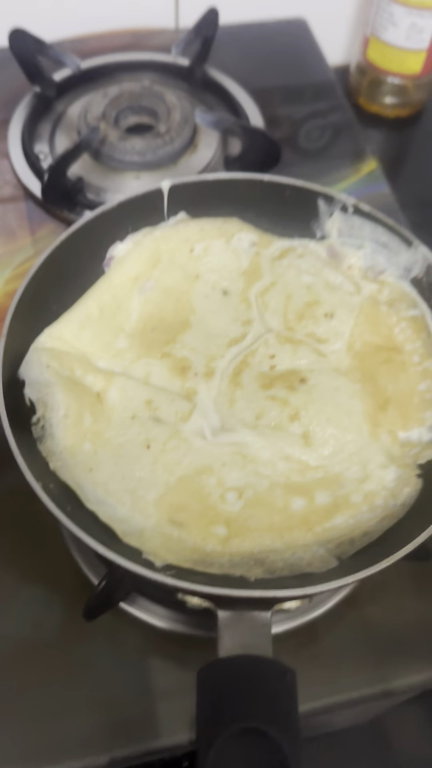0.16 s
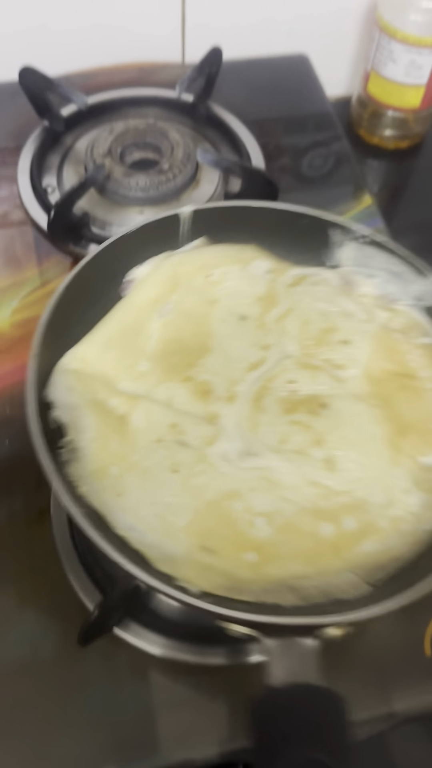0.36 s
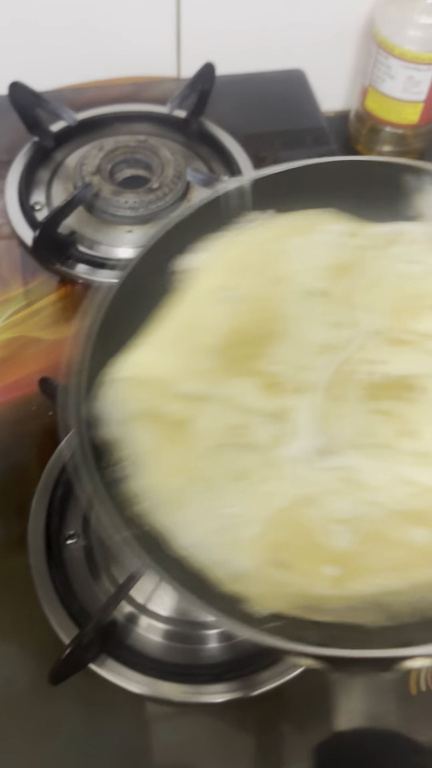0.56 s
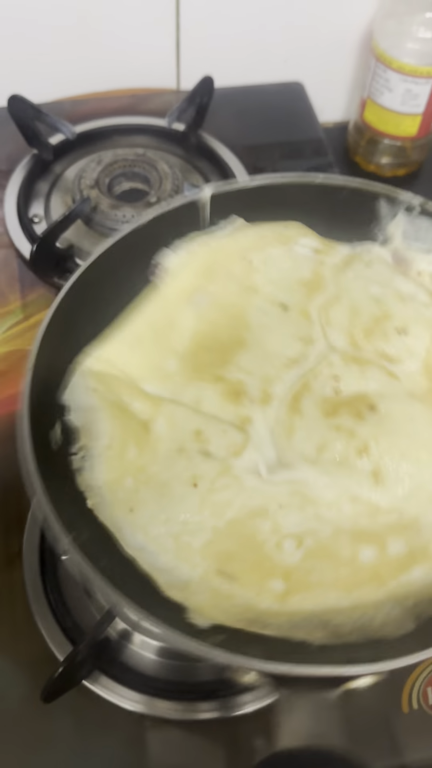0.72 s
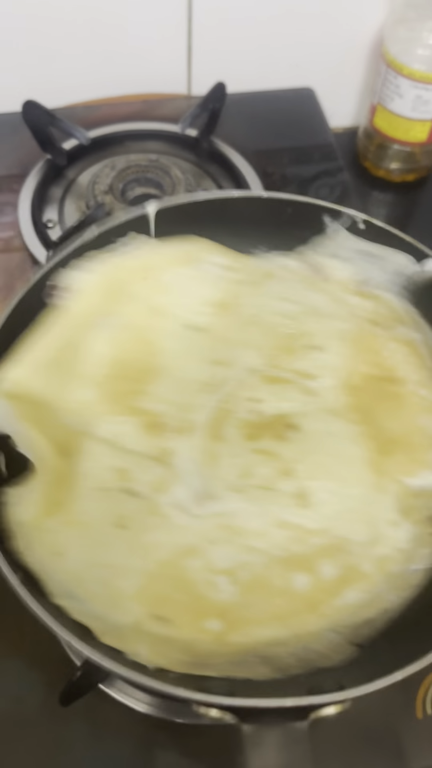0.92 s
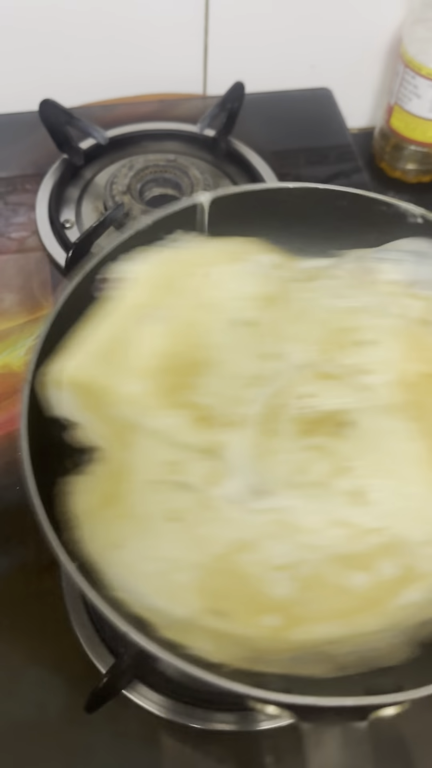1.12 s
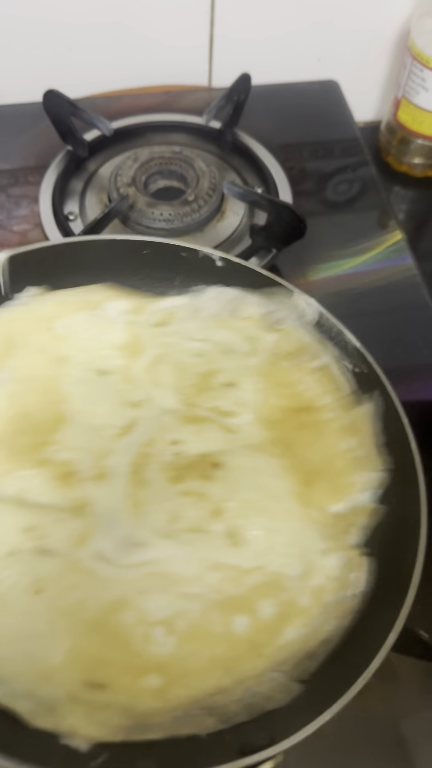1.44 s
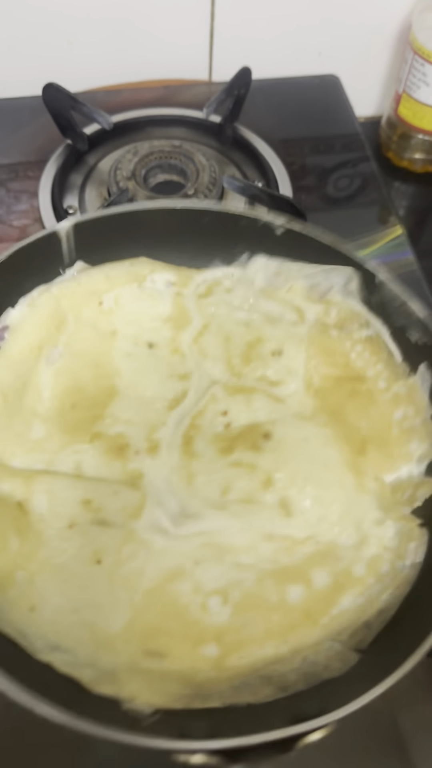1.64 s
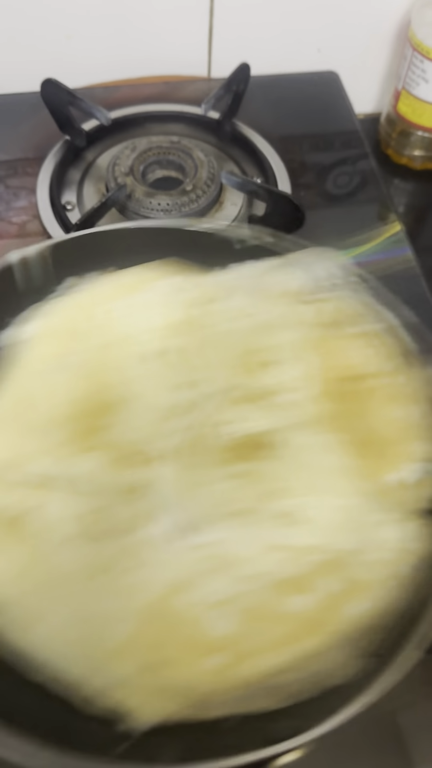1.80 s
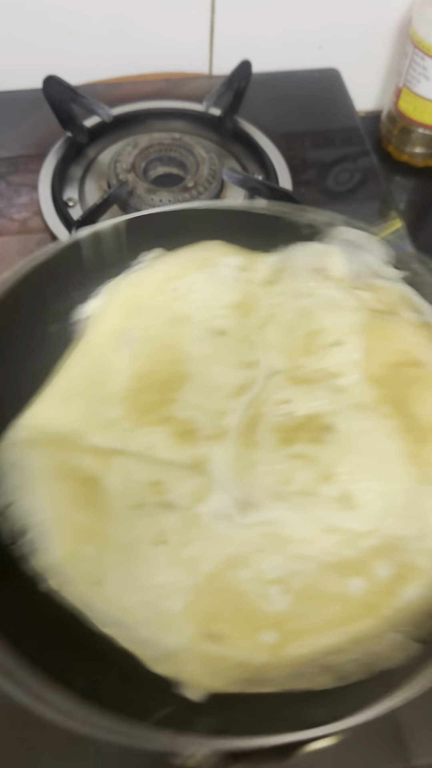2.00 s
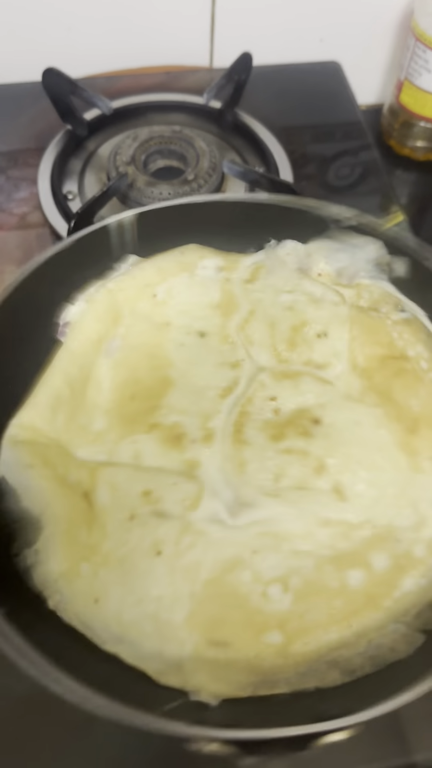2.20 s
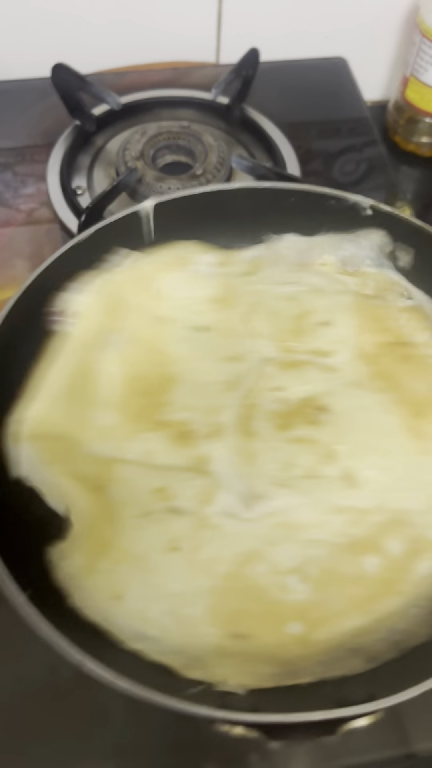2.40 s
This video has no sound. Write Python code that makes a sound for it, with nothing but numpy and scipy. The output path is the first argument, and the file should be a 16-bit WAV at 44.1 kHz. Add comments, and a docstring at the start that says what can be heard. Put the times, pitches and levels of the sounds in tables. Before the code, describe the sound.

Omelette swished back and forth in a shaken pan after one metallic clank, in a small kitchen

```python
"""A small hard kitchen, a phone held just above a frying pan that knocks once on the stove grate.
The knock is damped and long metal modes with a noisy rattle; then the pan is shaken to and fro. The omelette
slides with a grainy hiss of coloured noise, brighter one way and more ringing the other; its crisp edge ticks
on the rim as snaps and short modes, and the pan bumps now and then as clusters of mostly low modes.
Around it a noise-tail room, a burner hiss and a wavering low hum, both of filtered noise."""
import sys
import numpy as np
from scipy import signal
from scipy.fft import rfft, irfft
from scipy.io import wavfile
from scipy.ndimage import uniform_filter1d

SR = 44100
rng = np.random.default_rng(int(sys.argv[2]) if len(sys.argv) > 2 else 0)


def to_wav(s):
    """Save 16-bit WAV."""
    ch = np.atleast_2d(s).T  # columns
    pcm = np.round(np.clip(ch, -1, 1) * 32767)  # PCM
    wavfile.write(sys.argv[1], SR, pcm.astype(np.int16))


def voltage_ratio(level):
    """Linear amplitude factor for a level in decibels (scalar or array-like)."""
    return 10 ** (np.asarray(level, float) / 20)


N = 112454  # length in samples

# Level of the rub, with a click near 0.52 s, before the gain of each colour: start_s, level_db
RUB_LEVEL = [(.44, -70.5), (.51, -71), (.522, -53.5), (.54, -61), (.57, -74), (.6, -64), (.66, -59.5),
             (.71, -61), (.74, -47), (.78, -57.5), (.82, -49.5), (.86, -47), (.92, -65.5), (.95, -45),
             (.98, -53), (1.08, -53.5), (1.11, -68.5), (1.14, -49.5), (1.165, -45), (1.2, -61),
             (1.225, -46.5), (1.24, -52), (1.29, -53.5), (1.325, -66), (1.36, -47.5), (1.385, -49.5),
             (1.405, -60), (1.43, -49), (1.475, -48.5), (1.52, -66), (1.56, -51), (1.6, -57.5), (1.65, -56),
             (1.705, -69.5), (1.74, -51), (1.765, -49), (1.8, -59), (1.835, -50), (1.89, -50.5),
             (1.94, -63), (1.98, -47), (2.02, -47.5), (2.04, -60), (2.055, -51), (2.125, -51), (2.16, -64),
             (2.21, -45.5), (2.245, -53), (2.26, -52), (2.345, -50.5), (2.38, -67), (2.415, -47),
             (2.44, -47), (2.465, -59), (2.48, -49.5), (2.55, -49.5)]
# Spans with the pull colour: a faint early scrape with a click, then strokes towards the handle: start_s, end_s
PULL_SPANS = [(.44, .71), (.785, .915), (.975, 1.11), (1.2, 1.325), (1.405, 1.52), (1.595, 1.705),
              (1.805, 1.94), (2.038, 2.16), (2.248, 2.38), (2.465, 2.6)]
# Colour of the rub away from the handle: pitch_hz, relative_level_db
PUSH_COLOUR = [(180, -44), (300, -6.5), (630, -5.5), (1020, 2.5), (1700, -1), (2900, -2), (4000, -2),
               (4900, -8), (5600, -1), (7500, 3.5), (10000, 0), (12500, -5.5), (15000, -2.5), (16500, -23)]
# Colour of the rub towards the handle: pitch_hz, relative_level_db
PULL_COLOUR = [(180, -44), (300, -8), (650, -6.5), (920, 1), (1690, -2.5), (2320, -5.5), (3800, -2),
               (4900, -8.5), (5600, 0), (7900, 3), (10000, 1.5), (12500, -7), (15000, -1), (16500, -26)]
# Resonances of the pan floor that the pull excites: pitch_hz, width_hz, level_db (against the pull)
PAN_FLOOR_MODES = [(2300, 320, -12.5), (2477, 106, -14.5), (2800, 140, -18), (3230, 400, -15)]
# Ticks of the crisp edge on the rim: start_s, relative_level_db, centre_hz
EDGE_TICKS = [(0.4451, -47, 2800), (0.482, -44, 2390), (0.521, -41, 2470), (0.5285, -41.5, 3450),
              (0.5466, -45, 2880), (0.642, -37.5, 2860), (0.7342, -37, 3300), (0.7396, -31.5, 3580),
              (0.8339, -36, 2200), (0.851, -45, 2440), (0.881, -36, 2980), (0.984, -30.5, 2550),
              (1.2226, -28, 3440), (1.2266, -34.5, 3840), (1.4108, -32.5, 3500), (1.4155, -35, 2570),
              (1.5873, -36.5, 2280), (1.821, -29, 2540), (1.8277, -32, 2460), (1.8454, -36, 2390),
              (1.9753, -38, 2090), (2.0489, -26, 2780), (2.0549, -26.5, 2660), (2.1043, -34, 3060),
              (2.2547, -31, 3210), (2.2661, -23.5, 2720), (2.2741, -31.5, 2270), (2.402, -40, 4100),
              (2.4221, -37, 3700), (2.4821, -26.5, 2300)]
# Modes of one tick: multiple_of_centre, relative_level_db
TICK_MODES = [(.85, -8), (1, 1.5), (1.2, -6), (1.451, -7), (2.6, -14.5)]
# Dull bumps of the pan: start_s, relative_level_db, centre_hz, t60_s
PAN_BUMPS = [(0.7015, -35.5, 940, 0.011), (.754, -45.5, 440, 0.027), (0.933, -42, 1000, 0.01),
             (.942, -38, 800, 0.014), (0.949, -37.5, 98, 0.069), (.955, -45.5, 313, 0.063),
             (0.984, -42, 92, 0.054), (0.987, -45.5, 280, 0.039), (1.14, -38, 800, 0.014),
             (1.142, -43, 245, 0.03), (1.318, -42, 900, 0.014)]
# Modes of one bump: multiple_of_centre, relative_level_db
BUMP_MODES = [(.6, -4.5), (1, -1.5), (1.5, -4.5)]
# Quickly damped modes of the blow itself: pitch_hz, relative_level_db, t60_s
BLOW_MODES = [(572, 9, 0.05), (800, 13.5, 0.047), (1040, 15.5, 0.032), (1380, 14.5, 0.022),
              (2335, 6, 0.043), (2793, 6, 0.036), (4060, 2, 0.025), (6700, -6, 0.026), (8400, -8, .03)]
# Long modes of pan and grate: pitch_hz, relative_level_db, t60_s
RING_MODES = [(247.5, -8, 0.33), (318.7, -7, 0.52), (422.5, -9, 0.16), (842, -10, 0.27), (1073, -17, 0.22),
              (1260, -14, 0.1), (1340, -23, 0.2), (1694, -33, 0.35), (1870, -13.5, 0.23), (2320, -11, 0.15),
              (2493, -15, 0.37), (2735, -9, 0.23), (3100, -23, 0.23), (4100, -20, 0.24)]
# Colour of the rattle after the blow: pitch_hz, relative_level_db
RATTLE_COLOUR = [(88, -32), (150, -3.5), (248, 3.5), (441, -6.5), (812, -7), (2140, -13), (2710, -15.5),
                 (4900, -24.5), (7960, -23), (11000, -36), (14300, -86), (22000, -120)]
# Colour of the burner hiss: pitch_hz, relative_level_db
HISS_COLOUR = [(90, -40), (140, -12.5), (290, -12), (600, -17), (1130, -15), (1750, -20), (2600, -18.5),
               (4900, -27), (7500, -22.5), (10000, -23.5), (12500, -35), (15000, -27), (16500, -49)]
# The lower part of the hiss comes and goes: start_s, gain_db
LOW_HISS_GAIN = [(0, 4), (.35, -2.5), (.58, -8), (.8, 4), (1.05, -2), (1.27, -7), (1.4, 3), (1.52, -3),
                 (1.62, -1), (1.7, -8), (1.88, -5), (2.1, 2.5), (2.55, 3.5)]
# Colour of the hum: pitch_hz, relative_level_db
HUM_COLOUR = [(20, -44), (32, -9), (50, -2), (60, -2.5), (66, 10), (73, 1), (96, 0), (150, -8),
              (200, -12.5), (280, -17), (400, -70)]
# Swell of the hum: start_s, level_db
HUM_SWELL = [(0, -62.5), (.1, -61.5), (.16, -53.5), (.36, -62.5), (.46, -57), (.6, -63.5), (.9, -66.5),
             (1.9, -66), (2.15, -62), (2.3, -49.5), (2.55, -56.5)]
# Phase by which the left microphone port lags the right: pitch_hz, lag_radians
LEFT_PORT_LAG = [(0, 0), (2000, 0), (4000, .2), (6600, 0), (7300, .7), (10300, 2.1), (11200, 2.9),
                 (12500, np.pi), (13800, 3.4), (15700, 4.2)]
# Share of the sound that is unlike at the two ports: pitch_hz, level_db
UNLIKE_SHARE = [(60, -25), (250, -16.5), (500, -5.5), (1300, -11), (2000, -27.5), (2600, -10), (4400, -5.5),
                (6200, -16), (8000, -17), (16000, -24)]

# Flicker and waver settings are dB per unit of a smoothed random level, drawn afresh at the given rate
# Slide
PUSH_GAIN_DB, PULL_GAIN_DB, COLOUR_BLEND_S, SLIDE_FADE_IN_S = 4.5, 4, 0.01, 0.018
GRAINS_PER_S, GRAINS_DB = 2500, -2.5  # grain level before it joins unit-level smooth noise
GRAIN_SPREAD_DB, GRAIN_TOP = 3.5, 3.5  # dB per unit of an exponential draw, draw limit
FLICKER_DB, FLICKER_HZ = 2.0, 74.96
FLOOR_WAVER_DB, FLOOR_WAVER_HZ = 1.7, 30.3
BODY_LEAD_S, BODY_TOP_HZ = 0.01, 2000
# Ticks and bumps
TICK_TRIM_DB, TICK_RISE_S, TICK_DETUNE = -3.5, 0.0011, 0.035
TICK_T60_S, TICK_T60_S_PER_DB, TICK_T60_AT_DB = 0.013, 0.0005, -36
SNAP_DB, SNAP_DECAY_S, BUMP_RISE_S = -2.5, 0.0011, 0.00051
# Knock
KNOCK_S, KNOCK_MODES_DB, KNOCK_CUT_HZ = 0.1074, -33, 200
PUSH_CYCLES = 0.45  # time constant of each mode's rise, in its own cycles
RATTLE_DB, RATTLE_SPLIT_HZ, RATTLE_RISE_S = -27, 400, 0.0017  # level before it decays
RATTLE_HIGH_T60_S, RATTLE_LOW_T60_S, RATTLE_LOW_GAIN_DB = 0.22, 0.25, -1.0
KNOCK_LEFT_DB = -2.5  # left port in the body of the knock; the right gains what the left loses
# Room, burner and ports
ROOM_LOW_T60_S, ROOM_TREBLE_T60_S, ROOM_DB, ROOM_GAP_S = 0.42, 0.27, -12.5, 0.004
HISS_DB, LOW_SPLIT_HZ = -63, 750  # hiss level before it wavers
HISS_WAVER_DB, HISS_WAVER_HZ, LOW_WAVER_DB, LOW_WAVER_HZ = 3, 7.63, 1.6, 11
SMEAR_S = 0.017


def level(x, db):
    """Scale to an rms level."""
    return x * voltage_ratio(db) / np.sqrt(np.mean(x ** 2) + 1e-18)


def colour(x, table):
    """Filter by (Hz, dB) points joined on a log frequency axis."""
    hz, db = np.array(table, float).T
    f = np.maximum(np.arange(N // 2 + 1) * SR / N, 1)
    gain = voltage_ratio(np.interp(np.log(f), np.log(hz), db))
    return irfft(rfft(x, N) * gain, N)


def curve(table):
    """Gain along (s, dB) points."""
    s, db = np.array(table, float).T
    return voltage_ratio(np.interp(np.arange(N) / SR, s, db))


def random_level(hz):
    """Independent random values drawn hz times a second, with straight slews between them."""
    hold = int(SR / hz)
    values = rng.standard_normal(N // hold + 1)
    return uniform_filter1d(np.repeat(values, hold), hold)[:N]


def highpass(x, hz):
    """Steep low cut."""
    return signal.sosfilt(signal.butter(4, hz, "high", fs=SR, output="sos"), x)


def ring(t, hz, t60):
    """A damped mode that starts at t = 0."""
    u = np.maximum(t, 0)
    return np.sin(2 * np.pi * hz * u) * np.exp(-np.log(1000) * u / max(t60, 0.002))


def add(out, s, sound):
    """Mix a short sound in at time s."""
    i = int(s * SR)
    out[i:i + len(sound)] += sound[:N - i]


def friction():
    """Rubbing surfaces: smooth noise plus small random grains, with a quick flicker of level."""
    is_grain = rng.random(N) < GRAINS_PER_S / SR
    size = voltage_ratio(GRAIN_SPREAD_DB * np.minimum(rng.exponential(size=N), GRAIN_TOP))
    grains = is_grain * size * np.sign(rng.standard_normal(N))
    rough = rng.standard_normal(N) + level(grains, GRAINS_DB)
    return rough * voltage_ratio(FLICKER_DB * random_level(FLICKER_HZ))


def pull_rub(rough, rub):
    """Rub in the pull colour: coloured friction plus the pan-floor resonances it excites."""
    pulled = level(colour(rough, PULL_COLOUR), 0)
    for hz, width, db in PAN_FLOOR_MODES:
        mode = level(signal.lfilter(*signal.iirpeak(hz, hz / width, SR), rough), db)
        pulled += mode * voltage_ratio(FLOOR_WAVER_DB * random_level(FLOOR_WAVER_HZ))
    return voltage_ratio(PULL_GAIN_DB) * pulled * rub


def push_rub(rough, rub):
    """Rub in the push colour: coloured friction whose dull body speaks before its treble."""
    t = np.arange(N) / SR
    pushed = level(colour(rough, PUSH_COLOUR), 0)
    body = colour(pushed, [(BODY_TOP_HZ, 0), (1.25 * BODY_TOP_HZ, -30)])
    early_rub = np.interp(t + BODY_LEAD_S, t, rub)
    return voltage_ratio(PUSH_GAIN_DB) * ((pushed - body) * rub + body * early_rub)


def slide():
    """The omelette sliding: one friction noise, blended between the pull and push colours."""
    t = np.arange(N) / SR
    rough, rub = friction(), curve(RUB_LEVEL)
    pull_share = sum((t > a) * (t < b) for a, b in PULL_SPANS) * 1.0
    pull_share = uniform_filter1d(pull_share, int(COLOUR_BLEND_S * SR))
    fade_in = np.clip((t - RUB_LEVEL[0][0]) / SLIDE_FADE_IN_S, 0, 1)
    return fade_in * (pull_share * pull_rub(rough, rub) + (1 - pull_share) * push_rub(rough, rub))


def ticks():
    """Each tick is a dry snap and a few short, slightly detuned modes; harder ones ring longer."""
    out, t = np.zeros(N), np.arange(SR // 16) / SR
    band = signal.butter(2, [1300, 9000], "band", fs=SR, output="sos")
    for s, db, hz in EDGE_TICKS:
        t60 = TICK_T60_S + TICK_T60_S_PER_DB * (db - TICK_T60_AT_DB)
        modes = np.zeros(len(t))
        for n, (multiple, mode_db) in enumerate(TICK_MODES):
            detune = 1 + TICK_DETUNE * rng.standard_normal()
            modes += (-1) ** n * voltage_ratio(mode_db) * ring(t, hz * multiple * detune, t60)
        burst = rng.standard_normal(len(t)) * np.exp(-t / SNAP_DECAY_S)
        snap = voltage_ratio(SNAP_DB) * signal.sosfilt(band, burst)
        rise = 1 - np.exp(-t / TICK_RISE_S)
        add(out, s, voltage_ratio(db + TICK_TRIM_DB) * (rise * modes + snap))
    return out


def bumps():
    """Each bump is a soft push on a broad cluster of damped modes."""
    out, t = np.zeros(N), np.arange(SR // 3) / SR
    rise = 1 - np.exp(-t / BUMP_RISE_S)
    for s, db, hz, t60 in PAN_BUMPS:
        modes = sum((-1) ** n * voltage_ratio(mode_db) * ring(t, multiple * hz, t60)
                    for n, (multiple, mode_db) in enumerate(BUMP_MODES))
        add(out, s, voltage_ratio(db) * rise * modes)
    return out


def knock():
    """A push into damped and long modes, low ones swelling later, then a rattle whose bass dies last."""
    t = np.maximum(np.arange(N) / SR - KNOCK_S, 0)
    modes = np.zeros(N)
    for table in (BLOW_MODES, RING_MODES):
        for k, (hz, db, t60) in enumerate(table):
            rise = 1 - np.exp(-t * hz / PUSH_CYCLES)
            modes += (-1) ** k * voltage_ratio(db) * ring(t, hz, t60) * rise
    noise = level(colour(rng.standard_normal(N), RATTLE_COLOUR), RATTLE_DB)
    high = highpass(noise, RATTLE_SPLIT_HZ)
    low = (noise - high) * voltage_ratio(RATTLE_LOW_GAIN_DB)
    rattle = high * voltage_ratio(-60 * t / RATTLE_HIGH_T60_S) + low * voltage_ratio(-60 * t / RATTLE_LOW_T60_S)
    rattle *= 1 - np.exp(-t / RATTLE_RISE_S)
    return highpass(voltage_ratio(KNOCK_MODES_DB) * modes + rattle, KNOCK_CUT_HZ)


def room(x):
    """Reflections of a hard room as a noise tail, the treble dying first."""
    t = np.arange(SR // 2) / SR
    noise = rng.standard_normal(len(t))
    low = signal.sosfilt(signal.butter(1, 1200, fs=SR, output="sos"), noise)
    tail = low * voltage_ratio(-60 * t / ROOM_LOW_T60_S) + (noise - low) * voltage_ratio(-60 * t / ROOM_TREBLE_T60_S)
    tail *= t > ROOM_GAP_S
    return voltage_ratio(ROOM_DB) * signal.fftconvolve(x, tail / np.sqrt(np.sum(tail ** 2)))[:N]


def burner_hiss():
    """Coloured noise with a wavering upper part and a lower part that comes and goes."""
    hiss = level(colour(rng.standard_normal(N), HISS_COLOUR), HISS_DB)
    low = colour(hiss, [(LOW_SPLIT_HZ, 0), (LOW_SPLIT_HZ, -40)])  # an abrupt split
    high = (hiss - low) * voltage_ratio(HISS_WAVER_DB * random_level(HISS_WAVER_HZ))
    return high + low * curve(LOW_HISS_GAIN) * voltage_ratio(LOW_WAVER_DB * random_level(LOW_WAVER_HZ))


def hum():
    """Narrow low noise, wavering by itself, that swells and sinks."""
    return level(colour(rng.standard_normal(N), HUM_COLOUR), 0) * curve(HUM_SWELL)


def ports(x):
    """Two microphone ports: a phase lag that varies with pitch, and a smeared share of opposite sign."""
    hz, lag = np.array(LEFT_PORT_LAG).T
    half_turn = np.exp(0.5j * np.interp(np.arange(N // 2 + 1) * SR / N, hz, lag))
    t = np.arange(SR // 20) / SR
    smear = rng.standard_normal(len(t)) * np.exp(-t / SMEAR_S)
    smeared = signal.fftconvolve(x, smear / np.sqrt(np.sum(smear ** 2)))[:N]
    side = colour(smeared, UNLIKE_SHARE)
    left = irfft(rfft(x) / half_turn, N) + side
    right = irfft(rfft(x) * half_turn, N) - side
    return np.array([left, right])


def scene():
    """Pan, room and kitchen meet the two ports; the body of the knock leans right."""
    blow = knock()
    pan = slide() + ticks() + bumps() + blow
    knock_body = colour(blow, [(380, -40), (600, 0), (1000, 0), (2000, -15)])
    lean = knock_body * (voltage_ratio(KNOCK_LEFT_DB) - 1)
    heard = ports(pan + room(pan) + burner_hiss() + hum())
    return heard + lean * np.array([[1], [-1]])


def low_pass(x):
    """Removes everything above the highest recorded frequency."""
    return signal.sosfilt(signal.butter(12, 16680, fs=SR, output="sos"), x)


def record(dry):
    """The finished mix as the phone stores it."""
    return low_pass(dry)


dry = scene()
out = record(dry)
to_wav(out)
```